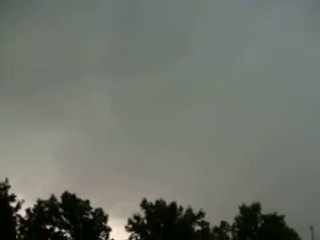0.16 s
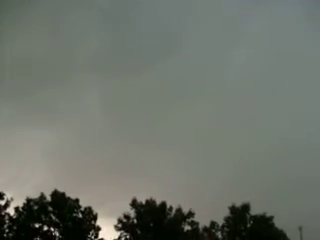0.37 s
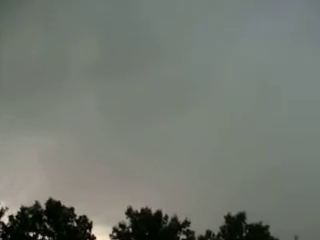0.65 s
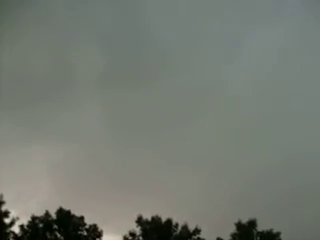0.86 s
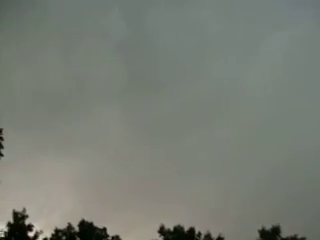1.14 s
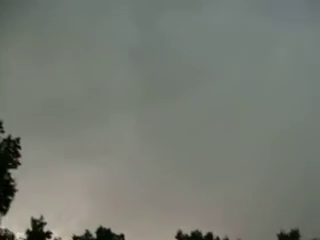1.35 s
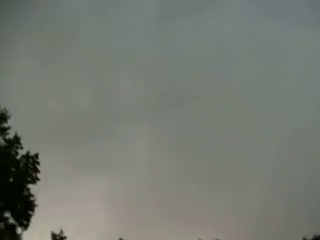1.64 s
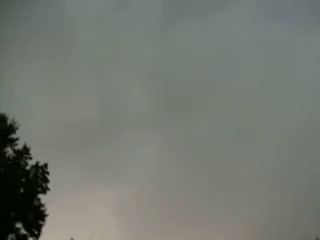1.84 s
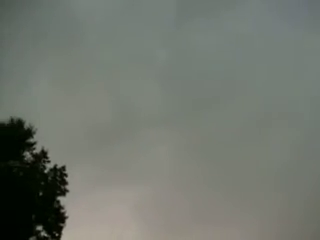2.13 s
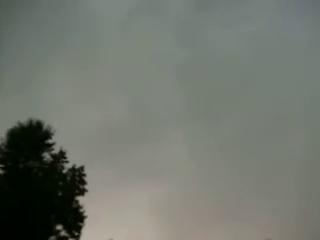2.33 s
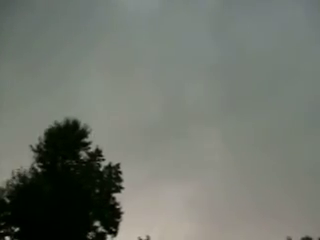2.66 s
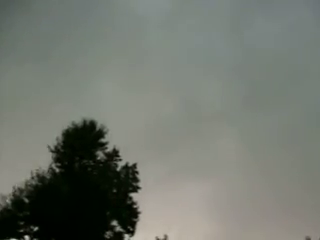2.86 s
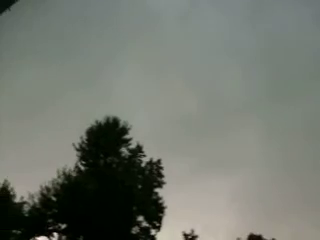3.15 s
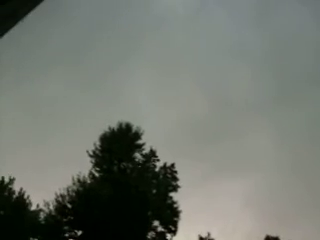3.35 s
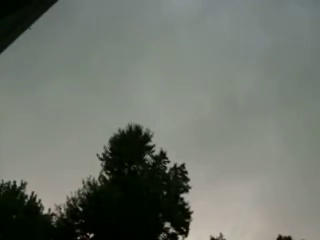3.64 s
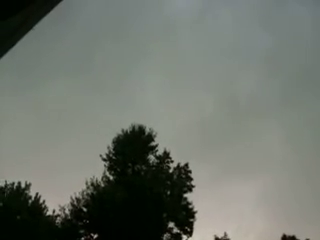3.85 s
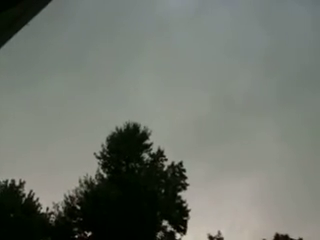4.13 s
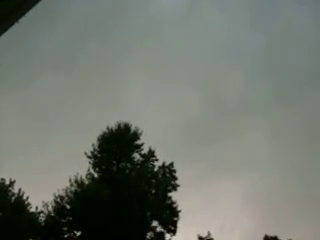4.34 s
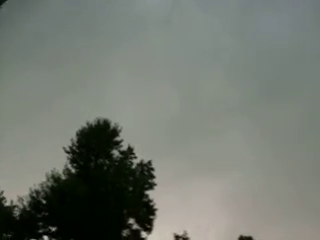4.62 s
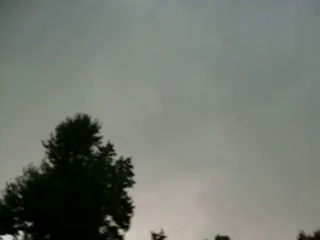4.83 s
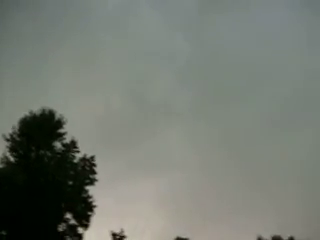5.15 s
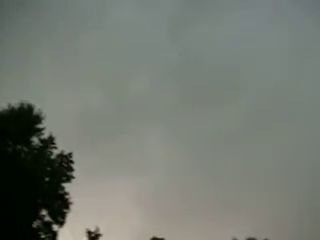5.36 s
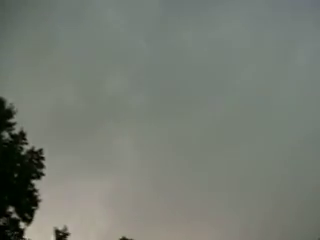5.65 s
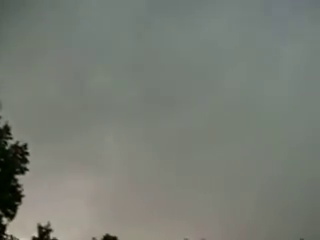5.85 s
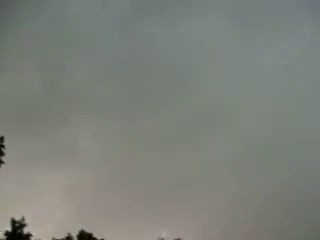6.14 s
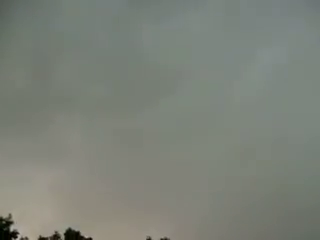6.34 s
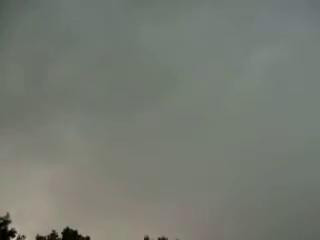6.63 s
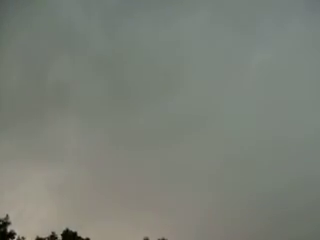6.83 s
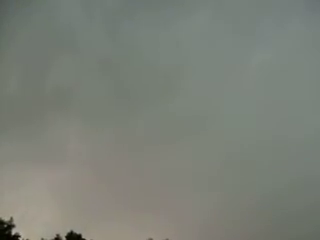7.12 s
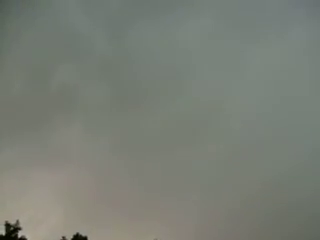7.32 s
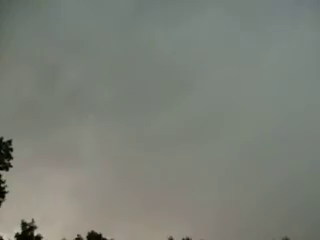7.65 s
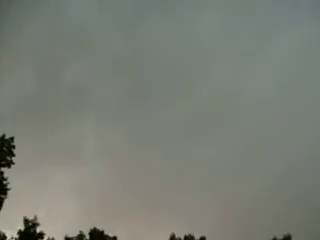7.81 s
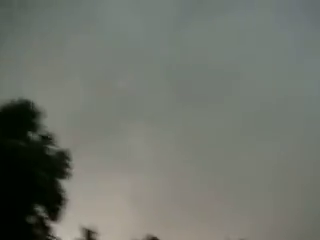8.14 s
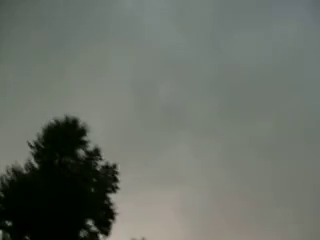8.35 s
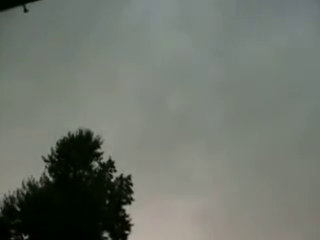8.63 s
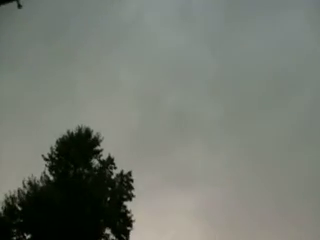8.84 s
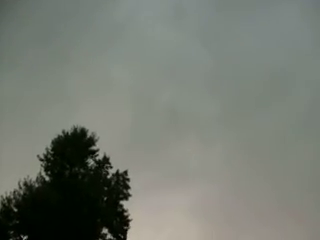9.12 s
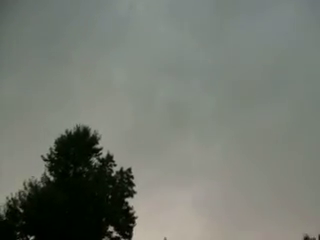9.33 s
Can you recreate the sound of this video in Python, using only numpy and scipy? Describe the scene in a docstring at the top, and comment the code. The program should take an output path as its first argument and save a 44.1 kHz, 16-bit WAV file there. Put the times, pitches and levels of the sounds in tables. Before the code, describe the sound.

Steady rain falls throughout, heard from under the eaves: a broad hiss on trees and ground with nearer patter and scattered short, bright splats. A very faint, thin high whine sits behind it. Heavy drips land with a short hollow note at about 1.2, 4.5 and 7.2 seconds. Wind nudges the microphone with soft low bumps between about 1.5 and 2.6 seconds.

At about 7.5 seconds close thunder breaks in with sharp, tearing cracks, far louder than the rain. These pile up into a rapid run of rough, booming claps over an unbroken roll, with strong hits near 7.7, 8.2, 8.5, 8.8 and 9.3 seconds. The claps overload the microphone and distort, making the rain sink and swell. The crackle gradually dulls, while the thunder is still going at the end, around 9.5 seconds.

```python
"""Thunder from a close lightning strike breaks late into steady rain, heard from under the eaves.
Shocks from the kinks of the channel tear as cracks, then pile up into clap after clap over a roll.
Each overloads the recorder, whose limiter ducks everything, so the rain sinks and swells.
Far drops on trees and ground merge into a hiss; near ones patter, splat and drip with a hollow note.
Wind nudges the microphone, and a thin, faint whine sits behind it all."""
import sys
import numpy as np
from scipy import signal
from scipy.fft import rfft, irfft, next_fast_len
from scipy.io import wavfile

SR = 44100
rng = np.random.default_rng(int(sys.argv[2]) if len(sys.argv) > 2 else 0)


def file_out(sig):
    """Save sig as 16-bit WAV at sys.argv[1]."""
    # one column per channel
    cols = np.atleast_2d(sig).T
    # limit, then scale
    lim = np.clip(cols, -1, 1)
    pcm = np.round(lim * 32767).astype(np.int16)
    wavfile.write(sys.argv[1], SR, pcm)


N = 418068
TIME = np.arange(N) / SR


# The dark tone of the thunder. Each row: frequency in Hz, relative level in dB.
THUNDER_EQ = [(55, -33), (100, -13), (160, -16), (230, -4), (400, -0.5), (600, 0.5), (1100, -2.5),
              (2200, -9), (3500, -17), (6000, -31.5), (10000, -90)]
# The unbroken roll beneath the claps. Each row: time in seconds, level in dB.
ROLL_FADER = [(7.51, -100), (7.553, -25.5), (7.66, -6), (7.88, -9.5), (8.25, -1.5), (8.6, 1.5), (9.2, -5.5),
              (9.48, -5.5)]
# One clap per branch of the lightning. Each row: peak time in seconds, level in dB,
# decay time in seconds, bass send in dB, groan pitch in Hz.
THUNDERCLAPS = [(7.6, -1, 0.016, -8, 560), (7.71, 10, 0.054, -6.5, 480), (7.775, -3.5, 0.053, -18, 780),
                (7.936, -5, 0.031, -13, 900), (8.075, 4, .02, -20, 680), (8.18, 10, 0.052, -10.5, 640),
                (8.363, 4, 0.041, -15, 680), (8.465, 10, .05, -6, 490), (8.52, 6, 0.039, -1, 331.5),
                (8.585, 5, 0.056, -16, 560), (8.7, 1, 0.044, -6, 360), (8.75, 5.5, 0.0282, -13, 627),
                (8.815, 9.5, 0.0395, -0.5, 278.5), (8.865, 4.5, .03, -7, 650), (9.02, -0.5, 0.049, -3, 560),
                (9.147, 8.5, 0.032, 0.5, 558.4), (9.295, 11.5, 0.029, -1, 592), (9.354, 8.5, .025, -4, 800)]

def thunder(boom_db=2.0, roll_bass_db=-9.5, groan_db=-1.5, crackle_follow=0.69, fade_db_per_s=2.95):
    """Shocks from the lightning channel arrive in clumps; its far parts boom, its near parts crackle."""
    far_shocks = impacts(per_s=4600, spread_db=2.5) * from_db(2.0 * drift(42))
    far = shelter(coloured(far_shocks, THUNDER_EQ))
    near_shocks = impacts(per_s=2000, spread_db=2.0) * from_db(1.5 * drift(90))
    near = coloured(near_shocks, THUNDER_EQ)
    body_gain = fader(ROLL_FADER)
    bass_gain = from_db(roll_bass_db) * body_gain
    groans = 0
    for peak_s, db, decay_s, bass_db, hz in THUNDERCLAPS:
        swell = from_db(db) * clap_swell(peak_s, decay_s)
        body_gain = np.hypot(body_gain, swell)   # the swells add in power
        bass_gain = np.hypot(bass_gain, from_db(bass_db) * swell)
        groans += from_db(groan_db) * swell * groan(peak_s, decay_s, hz)
    # Later sound has come farther and lost treble.
    age_s = np.maximum(TIME - ROLL_FADER[0][0], 0)
    crackle_gain = body_gain ** crackle_follow * from_db(-fade_db_per_s * age_s)
    boom = from_db(boom_db) * bass_gain * rms_one(band(far, 280, "low", order=4))
    body = body_gain * rms_one(band(far, [380, 1300], "band", order=4))
    crackle = crackle_gain * rms_one(band(near, 1290, "high", order=4))
    return boom + body + crackle + groans


def clap_swell(peak_s, decay_s, rise_share=0.86):
    """A clap swells to its peak and dies away exponentially."""
    age = (TIME - peak_s) / decay_s
    falloff = np.where(age < 0, (age / rise_share) ** 2, age)
    return np.exp(-np.minimum(falloff, 20))


def groan(peak_s, glide_s, hz, glide_octaves=0.35, wander_hz=45, evenness=0.82):
    """Nearly evenly spaced shocks merge into a rough pitch that falls as the branch recedes."""
    wander = band(rng.standard_normal((2, N)), wander_hz, "low")
    wander /= (np.hypot(*wander) + 1e-9) ** evenness   # steadies the level, keeps the phase rough
    pitch_hz = hz * 2 ** (-glide_octaves * np.tanh((TIME - peak_s) / glide_s))
    phase = 2 * np.pi * np.cumsum(pitch_hz) / SR
    return rms_one(wander[0] * np.cos(phase) + wander[1] * np.sin(phase))


# Sharp cracks from the nearest kinks. Each row: start in seconds, level of the first 4 ms in dB.
LIGHTNING_CRACKS = [(7.556, -23), (7.587, -1), (7.604, 4), (7.609, 9.5), (7.677, 12), (7.722, 16),
                    (7.904, -2.5), (7.975, 2), (7.984, 2.5), (8.085, 4), (8.18, 7), (8.347, 3), (8.426, 4),
                    (8.97, 0.5), (9.09, -2.5), (9.264, -11)]

def cracks(t60_s=0.03):
    """Each crack is a steep shock front with a quickly dying scatter behind it."""
    out, t = np.zeros(N), TIME[:SR // 20]
    for start_s, db in LIGHTNING_CRACKS:
        scatter = rng.standard_normal(len(t)) * from_db(-60 * t / t60_s)
        crack = band(scatter, [700, 2900], "band", order=3)
        add(out, from_db(db) * crack / crack[:SR // 250].std(), start_s)
    return out


# Resonances of the space under the eaves. Each row: frequency in Hz, width in Hz, gain in dB.
EAVES_MODES = [(137, 10, 2), (207, 14, 3), (322, 26, 1), (572, 30, -9), (745, 18, -3)]

def shelter(x):
    """Sound that enters under the eaves sets the space ringing."""
    return x + sum(from_db(db) * resonance(x, hz, width) for hz, width, db in EAVES_MODES)


# The broad tone of the rain. Each row: frequency in Hz, relative level in dB.
RAIN_EQ = [(20, -18), (50, -17), (85, -9), (150, -7), (320, -1.5), (600, -0.5), (1500, -.5), (3200, -1.5),
           (5800, -.5), (7500, -6), (10000, -15.5), (11200, -20.5), (12000, -31.5)]
# The strength of the shower. Each row: time in seconds, gain in dB.
RAIN_FADER = [(0, -20), (0.5, -21.5), (4.3, -21.5), (6.1, -20.5), (7.5, -20.5)]

def rain(hiss_db=-1.5, patter_db=-7.5, tick_db=-32):
    """Far drops merge into a hiss, nearer ones patter on leaves, tiny ones tick by the microphone."""
    far = rng.standard_normal(N) * from_db(0.59 * drift(9.7))
    near = np.zeros(N)
    edges_hz = np.geomspace(400, 12800, num=6)
    for octave in zip(edges_hz, edges_hz[1:]):
        drops = band(impacts(per_s=900, spread_db=3.5), octave, "band")
        near += drops * from_db(2.1 * drift(23))   # each register flickers on its own
    hiss = from_db(hiss_db) * coloured(far, RAIN_EQ)
    patter = from_db(patter_db) * coloured(near, RAIN_EQ)
    ticks = from_db(tick_db) * rms_one(band(impacts(per_s=5, spread_db=2.0), [5000, 9000], "band"))
    return fader(RAIN_FADER) * (hiss + patter + ticks)


# The loudest close drops. Each row: start in seconds, level in dB, centre of the spray in Hz.
CLOSE_SPLATS = [(.319, -13.5, 7040), (2.112, -12, 4200), (2.725, -14, 4500), (4.558, -15, 4400),
                (4.682, -16, 4200), (4.826, -12.5, 7500), (5.809, -16, 7000), (5.979, -12, 4220),
                (6.206, -14, 4400), (6.539, -14, 6470), (7.466, -14, 6950)]

def splats(t60_s=0.013, edge_ratio=1.38):
    """Drops burst on a hard surface close by, in a short bright spray."""
    out, t = np.zeros(N), TIME[:SR // 10]
    for start_s, db, hz in CLOSE_SPLATS:
        spray = band(rng.standard_normal(len(t)), [hz / edge_ratio, hz * edge_ratio], "band", order=3)
        add(out, from_db(db - 60 * t / t60_s) * rms_one(spray), start_s)
    return out


# Heavy drips from the eaves. Each row: start in seconds, level in dB, pitch in Hz,
# seconds for the note to fall 60 dB, splash gain against the note.
EAVES_DRIPS = [(1.161, -23, 1600, .08, 1.0), (1.174, -17, 2030, .12, 1.0), (4.5, -16, 845, .08, .2),
               (7.233, -12, 834, .11, .3), (7.32, -21, 834, .08, .2)]

def drips(rise_s=0.0017, splash_t60_s=0.11):
    """A heavy drip splashes and sets a short hollow note ringing."""
    out, t = np.zeros(N), TIME[:SR // 4]
    attack = 1 - np.exp(-t / rise_s)
    for start_s, db, hz, t60_s, splash_gain in EAVES_DRIPS:
        note = np.sin(2 * np.pi * hz * t) * from_db(-60 * t / t60_s)
        spray = rms_one(band(rng.standard_normal(len(t)), [900, 2400], "band"))
        splash = spray * from_db(-60 * t / splash_t60_s)
        add(out, from_db(db) * (note + splash_gain * splash) * attack, start_s)
    return out


# The breeze between the buffets. Each row: time in seconds, level in dB.
BREEZE_FADER = [(1.0, -60), (1.4, -45), (2.2, -43), (2.55, -45), (2.75, -52), (4.7, -63), (5.1, -48.5),
                (7.5, -58)]
# The strongest wind bumps. Each row: peak time in seconds, level in dB, half-length in seconds.
WIND_BUFFETS = [(1.47, -33, .03), (1.59, -25, .045), (1.66, -36, .04), (1.835, -29, .02),
                (1.985, -25.5, 0.026), (2.1, -32, .05), (2.171, -30, .05), (2.355, -34.5, .03),
                (2.49, -38, .03), (2.583, -19, 0.023), (3.8, -34, 0.022)]

def wind(breeze_hz=130, buffet_hz=185, reference_db=-27.5, db_per_octave=15.5):
    """Small eddies rumble on the microphone; strong ones slap it, the stronger ones reaching higher."""
    rumble = band(rng.standard_normal(N), breeze_hz, "low", order=4)
    gusts = band(rumble, 29, "high") * from_db(drift(13))
    out = fader(BREEZE_FADER) * rms_one(gusts)
    for peak_s, db, half_s in WIND_BUFFETS:
        swell = np.hanning(int(2 * half_s * SR))
        edge_hz = buffet_hz * 2 ** ((db - reference_db) / db_per_octave)
        lows = band(rng.standard_normal(SR // 2), edge_hz, "low", order=5)
        eddy = band(lows, edge_hz / 4, "high")[-len(swell):] * swell
        swell_rms = np.sqrt(np.mean(swell ** 2))
        add(out, from_db(db) * swell_rms * rms_one(eddy), peak_s - half_s)
    return out


# Hollow surfaces out in the rain. Each row: pitch in Hz, width in Hz, level in dB.
HOLLOW_SURFACES = [(362, 110, -56), (586.6, 20, -47), (799, 24, -53)]

def drumming():
    """Drops keep a few hollow surfaces ringing faintly."""
    return sum(from_db(db) * rms_one(resonance(impacts(per_s=70, spread_db=1.0), hz, width))
               for hz, width, db in HOLLOW_SURFACES)


def whine(hz=7849, rms_db=-49):
    """A thin, steady high tone with a slight waver."""
    return from_db(rms_db) * np.sqrt(2) * np.sin(2 * np.pi * hz * TIME + 0.2 * drift(2))


def from_db(db):
    """Decibels to gain."""
    return 10 ** (np.asarray(db) / 20)


def rms_one(x):
    """Scale to rms 1."""
    return x / np.sqrt(np.mean(x ** 2) + 1e-20)


def fader(rows):
    """Gain at every sample, riding through points of seconds and dB."""
    return from_db(np.interp(TIME, *np.transpose(rows)))


def drift(rate, hop=40, run_in=2000):
    """A smooth random wobble that changes about rate times a second; spread 1."""
    pole = np.exp(-2 * np.pi * rate * hop / SR)
    noise = rng.standard_normal(N // hop + run_in + 2)
    slow = signal.lfilter([1], [1, -2 * pole, pole * pole], noise)[run_in:]
    return np.interp(np.arange(N) / hop, np.arange(len(slow)), rms_one(slow))


def band(x, edges_hz, kind, order=2):
    """Butterworth filter."""
    return signal.sosfilt(signal.butter(order, edges_hz, kind, fs=SR, output="sos"), x + 1e-18)


def coloured(x, eq):
    """Shape a signal with an EQ curve; rms 1."""
    size = next_fast_len(N)
    hz, db = np.transpose(eq)
    bins_hz = np.maximum(np.arange(size // 2 + 1) * SR / size, 1)
    gain = from_db(np.interp(np.log(bins_hz), np.log(hz), db))
    return rms_one(irfft(rfft(x, size) * gain, size)[:N])


def resonance(x, hz, width_hz):
    """Two-pole resonance with gain 1 at its peak."""
    r = np.exp(-np.pi * width_hz / SR)
    feedback = [1, -2 * r * np.cos(2 * np.pi * hz / SR), r * r]
    return signal.lfilter(np.array([1, 0, -1]) * (1 - r * r) / 2, feedback, x + 1e-18)


def impacts(per_s, spread_db):
    """Clicks at random moments, many small and a few large; rms 1."""
    sizes = from_db(spread_db * np.minimum(rng.exponential(1, N), 4))
    signs = rng.choice([-1, 1], N)
    return rms_one(sizes * signs * (rng.random(N) < per_s / SR))


def add(out, sound, start_s):
    """Mix a sound in, starting at start_s seconds."""
    at = int(np.clip(start_s * SR, 0, N - 1))
    out[at:at + len(sound)] += sound[:N - at]


def scene():
    """A mono bed of rain, near drops and wind, with the thunder breaking over it."""
    bed = rain() + whine() + drumming() + drips() + splats() + wind()
    return (bed + thunder() + cracks())[None]


def limiter(x, threshold_db=-2.5, lag_s=0.00085, attack_s=0.00048, release_db_per_s=91):
    """Peaks over the threshold pull the gain down a moment too late; it climbs back at a steady rate."""
    over_db = np.maximum(20 * np.log10(np.abs(x[0]) + 1e-9) - threshold_db, 0)
    climb_db = release_db_per_s * TIME
    cut_db = np.maximum.accumulate(over_db + climb_db) - climb_db
    late_cut_db = np.interp(TIME - lag_s, TIME, cut_db)
    pole = np.exp(-1 / (attack_s * SR))
    return x * from_db(-signal.lfilter([1 - pole], [1, -pole], late_cut_db))


def record(dry, ceiling=0.59, rolloff_hz=11000, cutoff_hz=12200):
    """Peaks that slip past the limiter flatten against the ceiling; the treble rolls off and is cut."""
    held = limiter(dry)
    flattened = held / (1 + (held / ceiling) ** 12) ** (1 / 12)
    dulled = band(flattened, rolloff_hz, "low", order=6)
    return signal.sosfilt(signal.ellip(10, 0.1, 70, cutoff_hz, fs=SR, output="sos"), dulled)


dry = scene()
out = record(dry)
file_out(out)
```